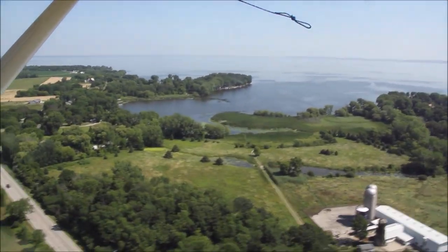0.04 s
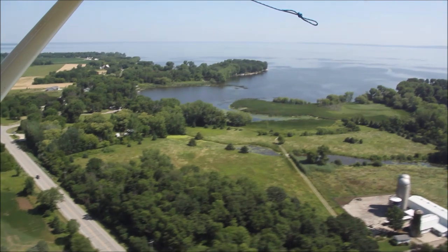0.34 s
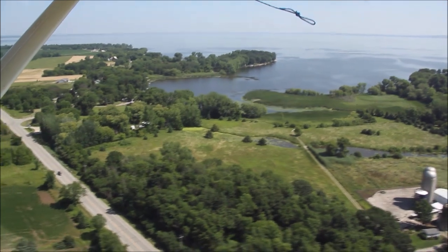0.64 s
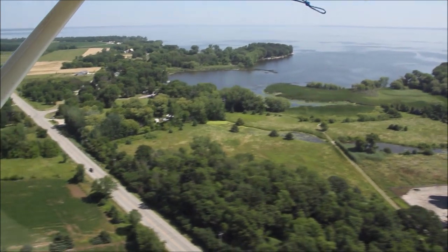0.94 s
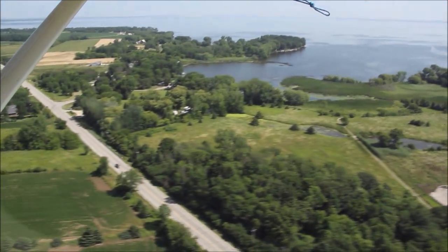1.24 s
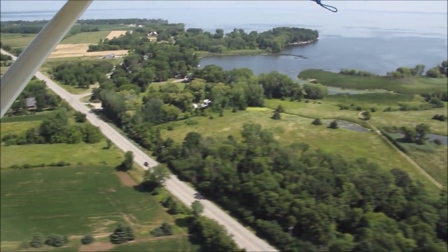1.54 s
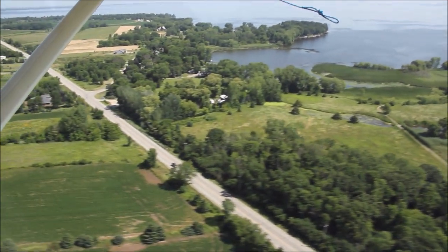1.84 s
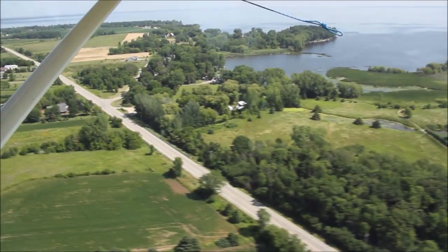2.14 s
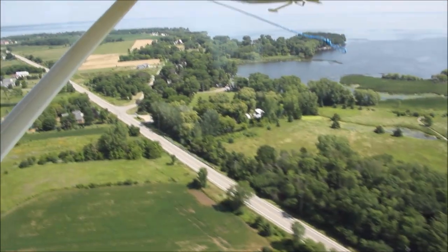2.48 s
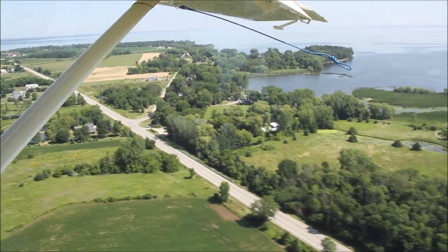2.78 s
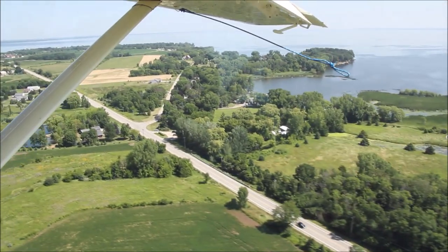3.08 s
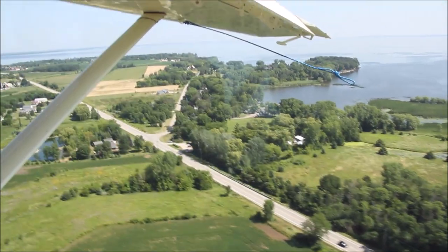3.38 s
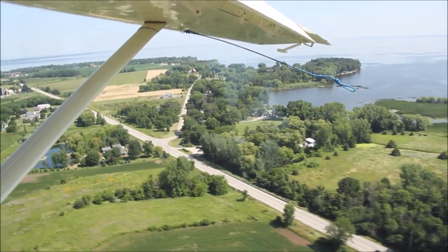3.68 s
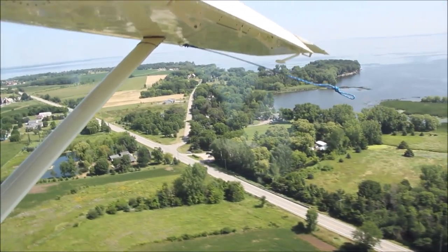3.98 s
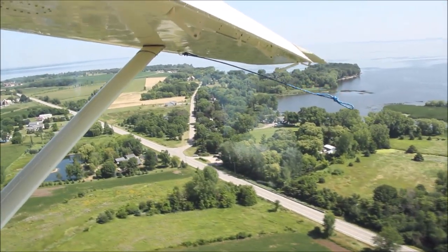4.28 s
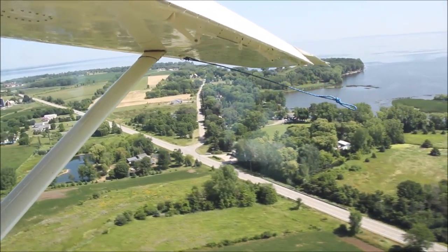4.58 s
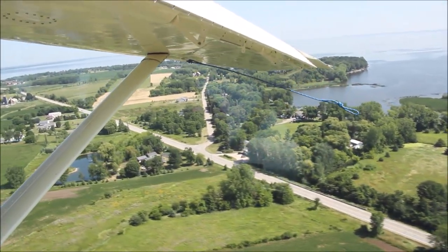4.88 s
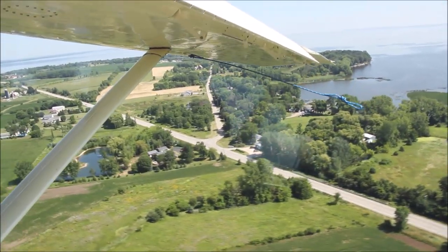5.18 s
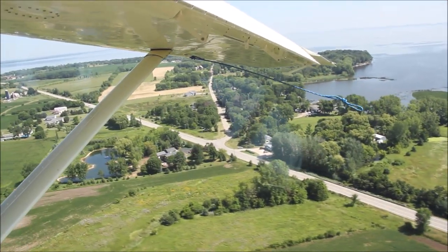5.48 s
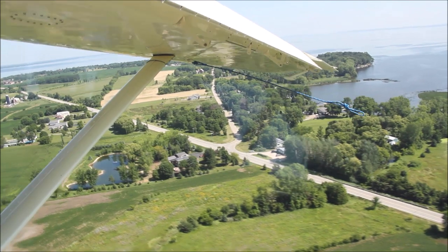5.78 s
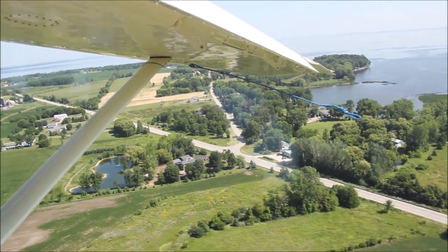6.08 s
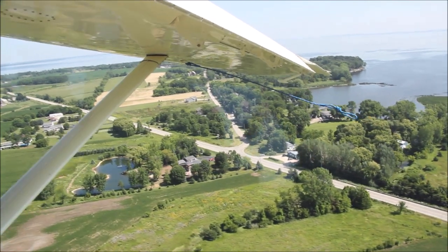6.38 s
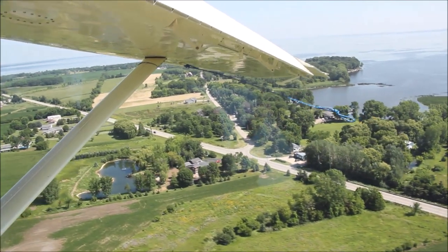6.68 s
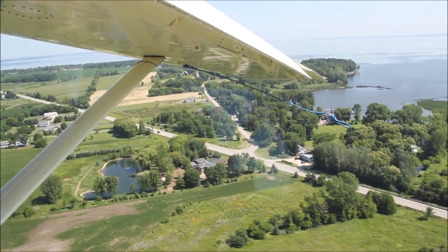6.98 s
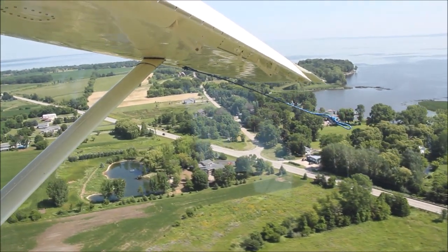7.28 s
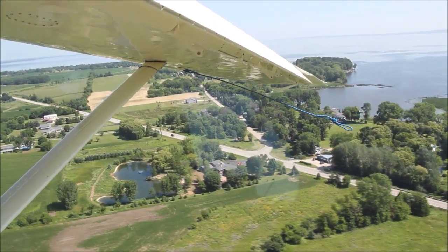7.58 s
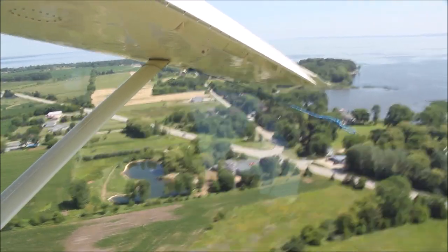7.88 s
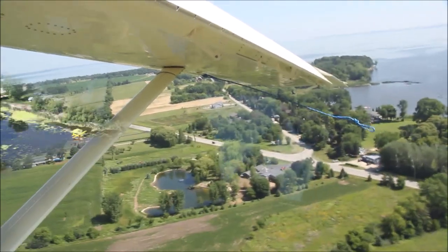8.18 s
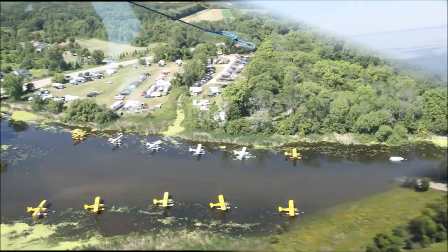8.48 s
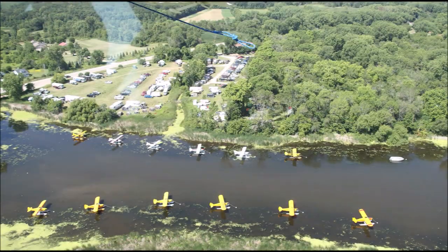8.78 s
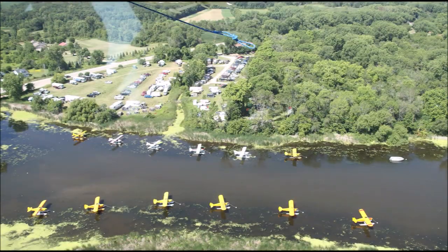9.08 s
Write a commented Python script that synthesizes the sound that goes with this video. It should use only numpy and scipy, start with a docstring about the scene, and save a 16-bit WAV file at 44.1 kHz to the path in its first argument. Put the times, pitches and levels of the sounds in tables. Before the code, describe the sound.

Steady throbbing engine hum and rushing air, heard from inside a light aircraft cruising in flight.

```python
"""A piston engine throbs at a steady speed, heard in the cabin of a small high-wing aircraft at cruise.
Exhaust pulses shake the cabin at harmonics of the engine cycle, over faint valve clatter and gear whine.
Turbulence booms in the cabin air, and the slipstream roars and hisses along the windows and rings
the panels. The treble flickers now and then, and the sound is cut off shortly before the end."""
import sys
import numpy as np
from scipy.fft import rfft, irfft, next_fast_len
from scipy.io import wavfile
from scipy.ndimage import map_coordinates

SR = 44100
rng = np.random.default_rng(int(sys.argv[2]) if len(sys.argv) > 2 else 0)


def unload_wav(signal):
    """Save mono or channel-first audio to the path in sys.argv[1] as 16-bit WAV at rate SR, clipped to [-1, 1]."""
    wavfile.write(
        sys.argv[1],
        SR,
        np.round(np.clip(np.atleast_2d(signal).T, -1, 1) * 32767).astype(np.int16),
    )


N = 411894
TIME = np.arange(N) / SR

# Rate of four-stroke cycles, one for every two turns of the crank: time_s, rate_hz
CYCLE_RATE = [(0, 14.592), (2.15, 14.629), (3.8, 14.574), (5.5, 14.609), (8.7, 14.591)]
# Exhaust harmonics, an order being a multiple of the cycle rate: order, relative_level_db
EXHAUST_HARMONICS = [(4, -45), (5, -39), (6, -28.5), (7, -23.3), (8, -46), (9, -29), (10, -43), (11, -44),
                     (12, -27), (13, -23.7), (14, -27), (15, -22), (16, -25.7), (17, -27.8), (18, -27.5),
                     (19, -39), (20, -45), (21, -45), (22, -45), (23, -47), (24, -35.3), (25, -40),
                     (26, -37.3), (27, -41)]
# Phase lag that pipes and cabin add from one harmonic to the next: order, lag_step_turns
PHASE_STEPS = [(6, -.13), (7, .35), (11, .35), (12, 0), (13, .2), (15, .45), (17, -.23), (19, .3), (26, .7)]
# Spectrum of the turbulent boom in the cabin: frequency_hz, relative_density_db
BOOM_SPECTRUM = [(8, -33), (22, -26), (40, -22.5), (70, -9), (110, -8.5), (143, -7), (165, -3.5),
                 (205, -2.5), (250, -6.5), (300, -7.5), (400, -15.5), (590, -17), (720, -31.5),
                 (1500, -56.5)]
# Spectrum of the air rushing along the windows: frequency_hz, relative_density_db
AIR_SPECTRUM = [(200, -19.5), (500, -1.5), (720, 1), (950, 1.5), (1350, 1), (1750, -1.5), (2200, -0.5),
                (3000, -1), (4300, -4.5), (5400, -9), (7000, -17), (9500, -17.5), (13000, -14),
                (15800, -20.5)]
# Gusts that strengthen the slipstream: peak_s, rise_db
SLIPSTREAM_GUSTS = [(0.02, 1.5), (3.34, 2), (3.95, 1.4), (5.75, 1.5), (6.45, 1.5), (7.82, 0.9), (8.55, 0.9)]
# Resonances of the cabin panels: pitch_hz, bandwidth_hz, relative_level_db
PANEL_MODES = [(802, 30, 0), (918, 40, -6.5), (1159, 29, -2), (2106, 82, -8.5), (2704, 110, -11)]
# Faint tones of gears and accessories: order, level_db
GEAR_TONES = [(35.48, -40), (37, -47), (42, -50), (46, -48), (64, -51), (71, -49), (82, -50)]
# Longer single dropouts of the treble: centre_s, length_s
TREBLE_DROPOUTS = [(0.479, 0.022), (3.869, 0.029)]
# Spells of brief treble dropouts, scattered at random: start_s, end_s, count
DROPOUT_SPELLS = [(0, .35, 2), (1.45, 2.3, 7), (3.3, 4.65, 3), (5.5, 6.7, 6), (7.5, 8.02, 5)]


def exhaust(cycle, gain_db, waver_db):
    """Periodic pulses form a harmonic series; unequal cylinders fill in every order of the cycle rate."""
    orders, levels_db = np.transpose(EXHAUST_HARMONICS)
    orders = np.round(orders)
    steps = np.interp(orders, *np.transpose(PHASE_STEPS))
    lags = np.cumsum(steps) - steps
    throb = np.zeros(N)
    for order, level_db, lag in zip(orders, levels_db, lags):
        strength = amp(level_db + gain_db + waver_db * wobble(5.4))  # combustion varies a little
        throb += strength * np.sin(2 * np.pi * (order * cycle - lag))
    return throb


def cabin_boom(cycle, level_db, throb_db, waver_db):
    """Amplitude modulation: the low noise of turbulence swells once in every engine cycle."""
    swell = amp(throb_db * np.cos(2 * np.pi * (cycle - .6)) + waver_db * wobble(2.9))
    return amp(level_db) * coloured(swell * rng.standard_normal(N), BOOM_SPECTRUM)


def slipstream(base_db, drift_db, flutter_db, gust_half_width_s, rush_gain_db, ring_gain_db):
    """Flow noise: propeller wash passes the windows in uneven puffs and sets the panels ringing."""
    gusts_db = sum(rise_db * np.exp(-((TIME - peak_s) / gust_half_width_s) ** 2)
                   for peak_s, rise_db in SLIPSTREAM_GUSTS)
    puffs = amp(base_db + gusts_db + drift_db * wobble(2.8) + flutter_db * wobble(30))
    rush = amp(rush_gain_db) * coloured(rng.standard_normal(N), AIR_SPECTRUM)
    ring = amp(ring_gain_db) * panel_ring(rng.standard_normal(N))
    return puffs * (rush + ring)


def cabin_mode(pitch_hz, half_width_hz, level_db):
    """Narrow-band resonance: buffeting excites one mode of the cabin air, which comes and goes."""
    response = lambda hz: 1 / (1 + ((hz - pitch_hz) / half_width_hz) ** 2)
    return amp(level_db) * unit(filtered(rng.standard_normal(N), response))


def panel_ring(drive):
    """Forced vibration: each panel mode responds as a damped oscillator; the sum is scaled to rms 1."""
    def response(hz):
        return sum(amp(db) * 1j * hz * width / (pitch ** 2 - hz ** 2 + 1j * hz * width)
                   for pitch, width, db in PANEL_MODES)
    return unit(filtered(drive, response))


def gear_whine(cycle, waver_db, whine_order, whine_db, swell_db):
    """Fixed gear ratios lock thin tones to the crank speed; the strongest swells and sinks at random."""
    tone = lambda order: np.sin(2 * np.pi * (order * cycle + rng.random()))
    faint = sum(amp(db + waver_db * wobble(4)) * tone(order) for order, db in GEAR_TONES)
    whine = amp(whine_db + swell_db * wobble(5)) * tone(whine_order)
    return faint + whine


def valve_clatter(cycle, direct_db, ring_db, points=2048):
    """Periodic excitation: the valve gear repeats one ragged pattern, heard directly and via the panels."""
    pattern = np.fft.irfft(np.exp(2j * np.pi * rng.random(points // 2 + 1)))  # flat, random in phase
    buzz = np.interp(cycle % 1, np.arange(points) / points, pattern)
    direct = coloured(buzz, [(330, -30), (430, -6), (950, -5.5), (1400, -15),
                             (3000, -24.5), (6000, -41.5)])
    return amp(direct_db) * direct + amp(ring_db) * panel_ring(direct)


def glint(t, low_hz=1000, high_hz=5015, count=12):
    """Inharmonic partials of random phase add up to a glassy ring, at rms 1."""
    hz = np.geomspace(low_hz, high_hz, count)[:, None] * rng.uniform(.93, 1.07, (count, 1))
    phase = rng.random((count, 1))
    strengths = amp(np.interp(hz, *np.transpose(AIR_SPECTRUM)))
    partials = strengths * np.sin(2 * np.pi * (hz * t + phase))
    return unit(partials.sum(axis=0))


def treble_flicker(sound, edge_hz, brief_s, slope_s, floor_db, glint_db, glint_s):
    """Gating of the upper band: the treble dips for hundredths of a second, leaving a faint glint."""
    brief = [(centre_s, brief_s) for start, end, count in DROPOUT_SPELLS
             for centre_s in start + (end - start) * (np.arange(count) + rng.random(count)) / count]
    gate, glints = np.ones(N), np.zeros(N)
    for centre_s, length_s in TREBLE_DROPOUTS + brief:
        near = np.abs(TIME - centre_s) < length_s + slope_s + 2 * glint_s
        t = TIME[near] - centre_s
        gate[near] *= np.clip((np.abs(t) - length_s / 2) / slope_s + 0.36, amp(floor_db), 1)
        glints[near] += amp(glint_db) * glint(t) * np.exp(-(t / glint_s) ** 2)
    low = filtered(sound, lambda hz: 1 / (1 + (hz / edge_hz) ** 6))
    return low + gate * (sound - low) + glints


def amp(db):
    """Decibels as an amplitude ratio."""
    return 10 ** (np.asarray(db) / 20)


def unit(x):
    """Normalisation to rms 1."""
    return x / np.sqrt(np.mean(x ** 2) + 1e-20)


def wobble(rate_hz):
    """Smooth random modulation: a spline through rate_hz Gaussian knots a second."""
    knots = rng.standard_normal(int(N * rate_hz / SR) + 4)
    coarse_s = TIME[::64]
    return np.interp(TIME, coarse_s, map_coordinates(knots, [coarse_s * rate_hz]))


def filtered(x, response):
    """Linear filtering: the spectrum of x is multiplied by a frequency response."""
    size = next_fast_len(N + SR // 2)
    return irfft(rfft(x, size) * response(np.fft.rfftfreq(size, 1 / SR)), size)[:N]


def coloured(x, spectrum):
    """Spectral shaping by (frequency_hz, relative_db) points on a log axis, at rms 1."""
    points_hz, db = np.transpose(spectrum)
    return unit(filtered(x, lambda hz: amp(np.interp(np.log(hz + 1), np.log(points_hz), db))))


def scene():
    """Superposition: engine and airflow add in the cabin, and the treble of the sum flickers."""
    cycle = np.cumsum(np.interp(TIME, *np.transpose(CYCLE_RATE))) / SR  # engine cycles elapsed
    throb = exhaust(cycle, gain_db=2.5, waver_db=1.07)
    valves = valve_clatter(cycle, direct_db=-40, ring_db=-47)
    gears = gear_whine(cycle, waver_db=2.5, whine_order=54, whine_db=-38.5, swell_db=3)
    boom = cabin_boom(cycle, level_db=-21, throb_db=-1.04, waver_db=0.6)
    hum = cabin_mode(pitch_hz=139, half_width_hz=3.7, level_db=-30)
    air = slipstream(base_db=-29, drift_db=0.1, flutter_db=0.5, gust_half_width_s=.14,
                     rush_gain_db=1.35, ring_gain_db=-7)
    cabin = throb + valves + gears + boom + hum + air
    return treble_flicker(cabin, edge_hz=1300, brief_s=.0099, slope_s=.015, floor_db=-35,
                          glint_db=-27.5, glint_s=.016)[None]


def record(dry, end_s=8.754, top_hz=15850):
    """Exponential decay cuts the sound off abruptly, and a low-pass filter limits its band."""
    fade = amp(-60 * np.clip((TIME - end_s) / .025, 0, 3))  # 60 dB every 25 ms
    return filtered(dry[0] * fade, lambda hz: .5 - .5 * np.tanh((hz - top_hz) / 40))[None]


dry = scene()
out = record(dry)
unload_wav(out)
```